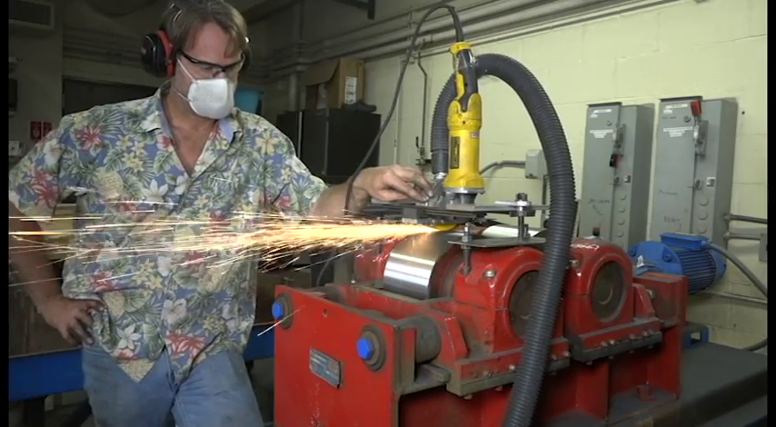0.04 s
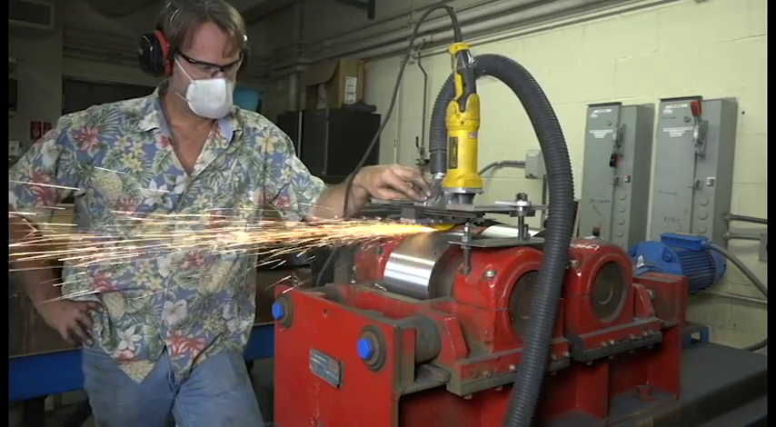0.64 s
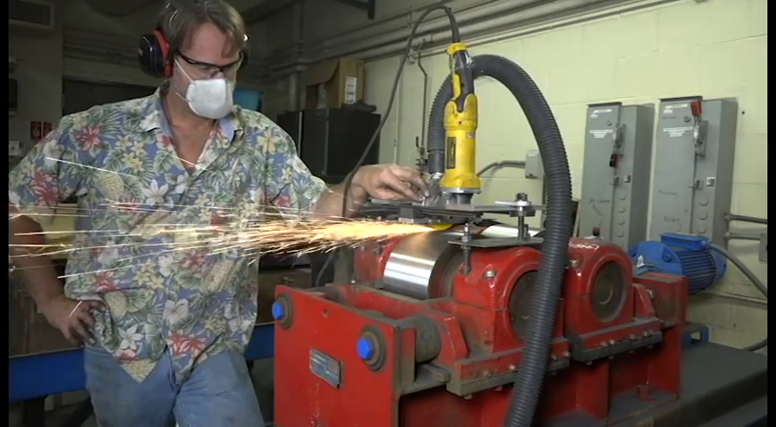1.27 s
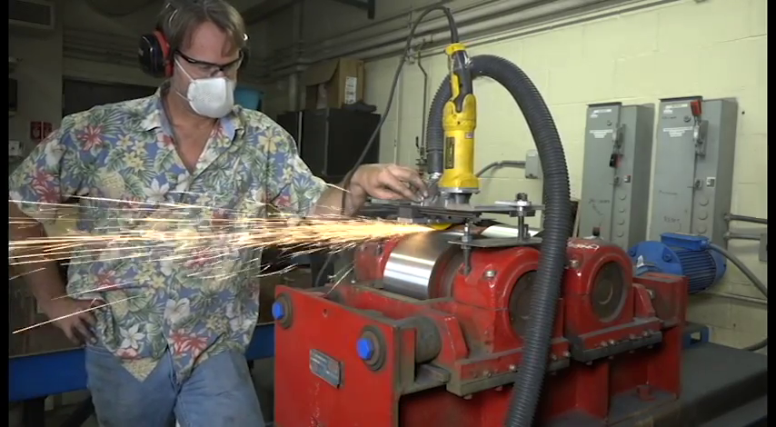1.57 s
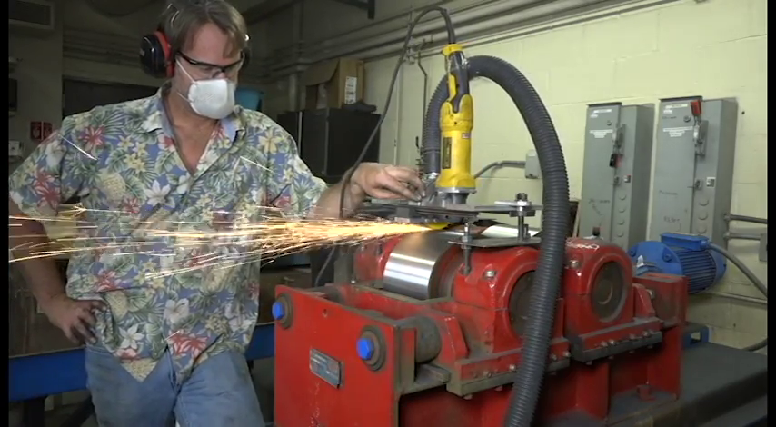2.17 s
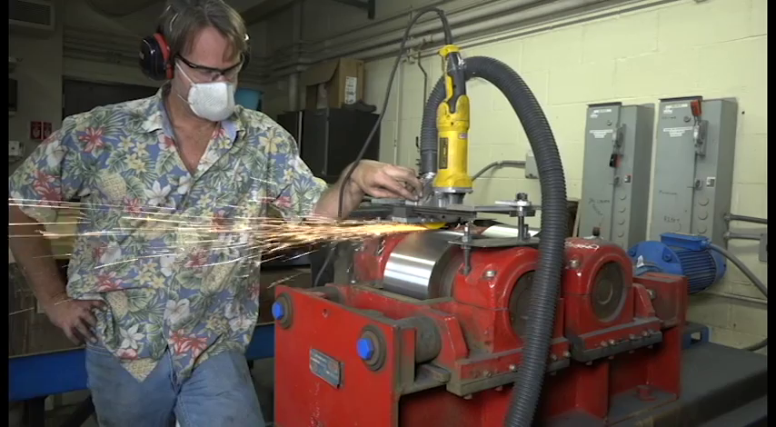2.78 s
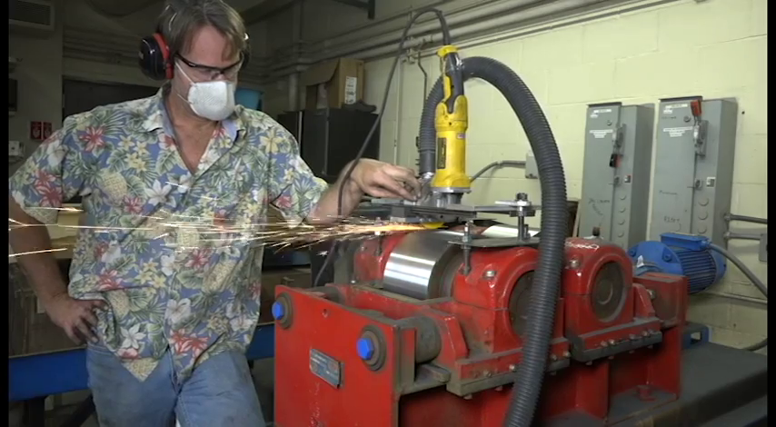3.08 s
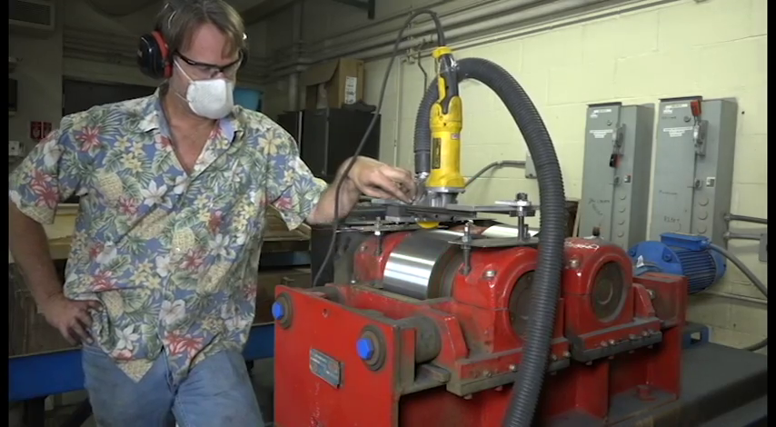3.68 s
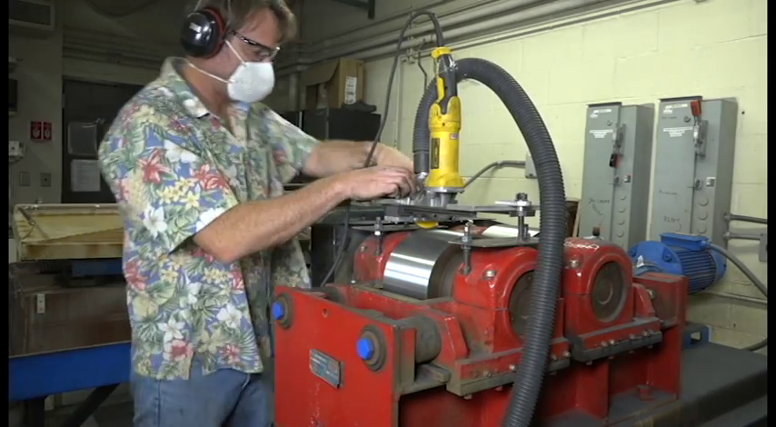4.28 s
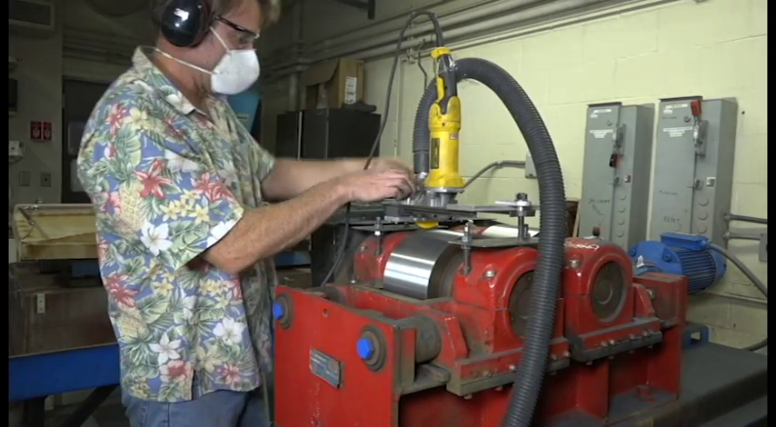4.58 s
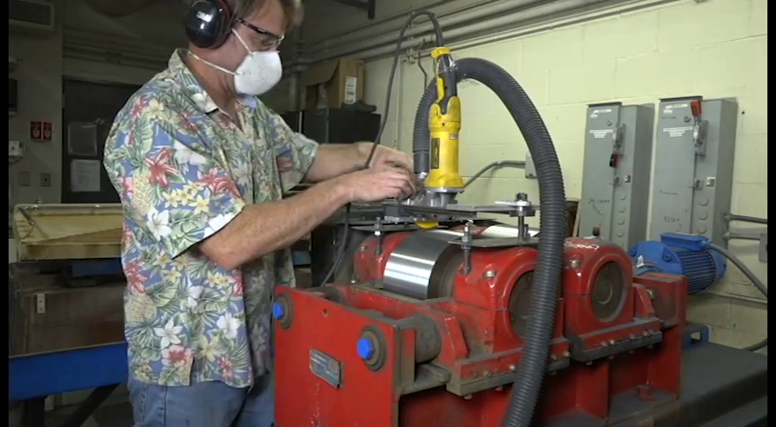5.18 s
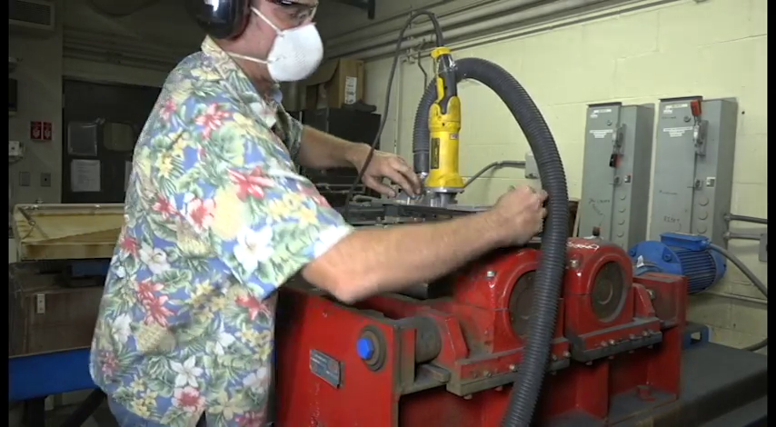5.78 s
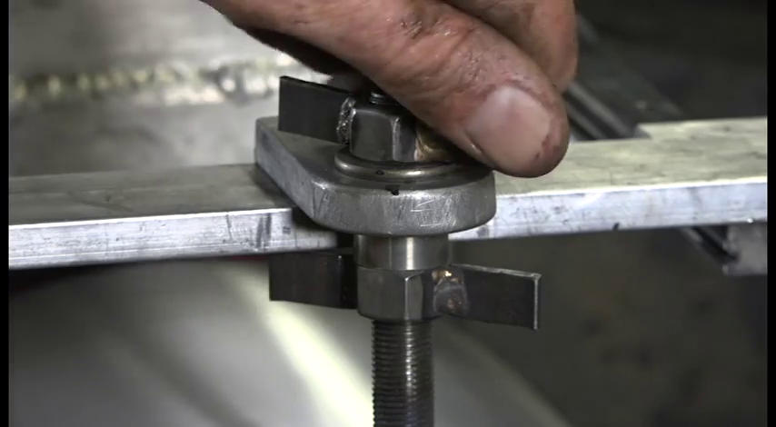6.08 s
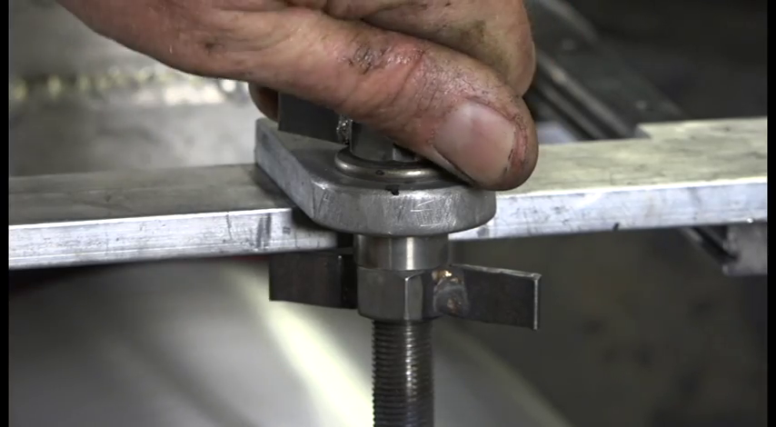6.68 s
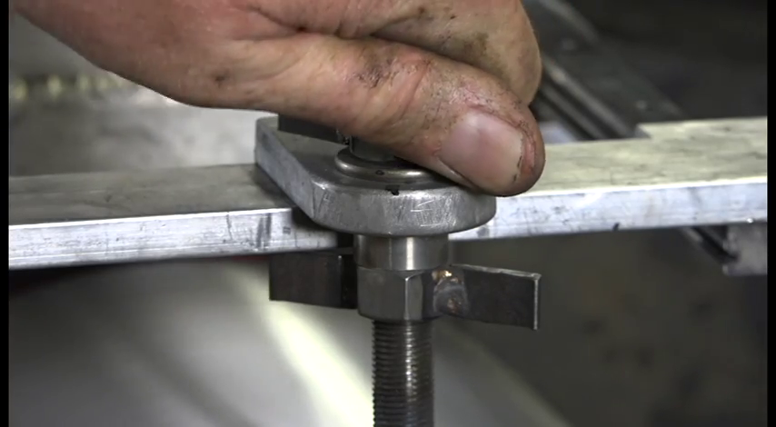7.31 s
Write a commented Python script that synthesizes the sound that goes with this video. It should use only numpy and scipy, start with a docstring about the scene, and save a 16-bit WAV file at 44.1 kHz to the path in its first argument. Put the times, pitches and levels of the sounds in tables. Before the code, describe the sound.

Ringing, hissing grinding on steel fades as the motor whine rises over a dust extractor, then switches to a close machine drone.

```python
"""A rolling mill, heard first from across the workshop: an electric grinder clamped to the mill
dresses a turning steel roll while a dust extractor runs. The disc drags the motor down and rings
under the grit; as the cut fades, the fan's whine climbs to its free pitch over the rush of air.
Then the microphone position jumps close to the feed screw: a fuller, duller rush and a machine drone."""
import sys
import numpy as np
from scipy import signal
from scipy.fft import rfft, irfft
from scipy.io import wavfile

SR = 44100
rng = np.random.default_rng(int(sys.argv[2]) if len(sys.argv) > 2 else 0)


def to_wav(sig):
    """Store sig (one row per channel, or 1-D mono) as 16-bit WAV at the path in sys.argv[1].

    Samples outside -1..1 are clipped; the rate is SR.
    """
    pcm = np.clip(np.atleast_2d(sig), -1, 1) * 32767
    pcm = np.round(pcm).astype(np.int16)
    wavfile.write(sys.argv[1], SR, pcm.T)  # frames by channels


N = 328545
TIME = np.arange(N) / SR
FREQ = np.maximum(np.arange(N // 2 + 1) * SR / N, 1)
JUMP_S = 5.6145  # from the far microphone position to the close one


def undb(db):
    """Decibels to gain."""
    return 10 ** (np.asarray(db) / 20)

def unit(x):
    """Scale to rms 1."""
    return x / np.sqrt(np.mean(x ** 2))

def curve(rows):
    """Join (t/s, value) rows by straight lines."""
    return np.interp(TIME, *np.transpose(rows))

def noise():
    """White noise."""
    return rng.standard_normal(N)

def shape(x, gain):
    """Filter by a gain for each frequency."""
    return irfft(rfft(x) * gain, N)

def walk(rate_hz):
    """Smooth random motion of rms 1, changing about rate_hz times a second."""
    return unit(shape(noise(), 1 / (1 + (FREQ / rate_hz) ** 4)))

def resonance(hz, width):
    """Complex response of one mode, gain 1 at its centre."""
    return 1 / (1 + 1j * (FREQ ** 2 - hz ** 2) / (FREQ * width))

def reflected(x, echo_db=-12, decay_s=.008, count=40):
    """Nearby walls and steel faces add short echoes that ripple the spectrum."""
    spread, polarity = rng.random((count, 2)).T
    lag_s = .002 + 3 * decay_s * spread
    sizes = np.sign(polarity - .5) * np.exp(-lag_s / decay_s)
    echoes = np.bincount((lag_s * SR).astype(int), sizes / np.linalg.norm(sizes), N)
    return shape(x, 1 + undb(echo_db) * rfft(echoes))

def rushing(spectrum, peaks):
    """Noise of rms 1, coloured by a smooth spectrum, resonances and nearby echoes."""
    hz, db = np.transpose(spectrum)
    smooth_db = np.interp(np.log(FREQ), np.log(hz), db)
    lift_db = sum(lift * abs(resonance(f, width)) ** 2 for f, width, lift in peaks)
    return unit(reflected(shape(noise(), undb(smooth_db + lift_db))))

def tone(hz, rms_db, drift, flutter_db):
    """A machine tone wavering a little in strength and pitch."""
    amplitude = np.sqrt(2) * undb(rms_db + flutter_db * walk(2.3))
    cycles = np.cumsum(hz * (1 + drift * walk(4.26))) / SR
    return amplitude * np.sin(2 * np.pi * cycles)


# Far position, extractor tones while unshielded: f/Hz, rms level/dB
EXTRACTOR_TONES = [(203, -91), (404, -78), (479.5, -63.5), (716, -70), (942, -64.5), (1439, -50),
                   (1814.5, -45)]

def extractor(lean_s=4.5, shield_db_per_s=2.5):
    """The extractor hums; the operator leans in and his body shields it more and more."""
    shield_db = shield_db_per_s * np.maximum(TIME - lean_s, 0)
    hum = sum(tone(hz, db, drift=0.00061, flutter_db=1) for hz, db in EXTRACTOR_TONES)
    return undb(-shield_db) * hum


# Close position, machine tones: f/Hz, rms level at the jump/dB, rms level at the end/dB
DRONE_TONES = [(119.5, -66, -64), (360, -52, -50), (454, -45.5, -45), (656, -51, -35.5),
               (798.5, -43.5, -51), (1310.5, -47, -40.5), (1518, -49, -47), (1966, -50, -47),
               (4128, -53, -44), (12452, -55, -56), (13103, -53, -54)]

def machine_drone():
    """The machines drone through the frame; the balance shifts with the microphone's spot."""
    moved = np.interp(TIME, [JUMP_S, TIME[-1]], [0, 1])
    return sum(tone(hz, first_db + (last_db - first_db) * moved, drift=0.000823, flutter_db=1.5)
               for hz, first_db, last_db in DRONE_TONES)


# Close position, spectrum of the rush: f/Hz, relative level/dB
SCREW_SPECTRUM = [(30, -48), (60, -39), (110, -30), (200, -17), (320, -11), (600, -6), (1080, -7),
                  (1400, -6), (2000, -6.5), (4900, -5.5), (7500, -16), (10500, -17.5), (13000, -21.5),
                  (15500, -24.5)]
# Resonances of the mill frame: f/Hz, width/Hz, lift/dB
FRAME_MODES = [(1330, 106, 4.5), (1750, 55, 3.5), (2570, 380, 3), (3350, 520, 1.5), (3850, 160, 2),
               (4970, 260, 1), (5940, 100, 3.5), (6780, 430, 4), (7950, 230, 1.5), (8740, 400, 3)]

def feed_screw_rush(start_db=-25, swell_db_per_s=.5):
    """Close to the feed screw, a full, dull rush swells slowly, coloured by the frame."""
    level_db = start_db + swell_db_per_s * (TIME - JUMP_S) + 0.54 * walk(25)
    return rushing(SCREW_SPECTRUM, FRAME_MODES) * undb(level_db)


# Far position, spectrum of cooling air and suction: f/Hz, relative level/dB
AIR_SPECTRUM = [(30, -64), (90, -59), (160, -54.5), (270, -40), (430, -32), (600, -23.5), (850, -18.5),
                (1300, -14.5), (2400, -9.5), (3400, -8), (4400, -9), (6000, -8), (11700, -8), (15500, -7)]
# Resonances and notches of the vents and hose mouth: f/Hz, width/Hz, lift/dB
VENT_MODES = [(595, 42, -5), (854, 56, 1.5), (1123, 190, 3), (1513, 97, 6), (1616, 120, -3), (1910, 140, 4),
              (2283, 120, 4.5), (4020, 200, 1.5), (4340, 200, -2.5), (4680, 180, 2), (5180, 210, 4.5),
              (5630, 330, 2.5), (7130, 170, 2), (8200, 130, 4.5), (9280, 160, 5), (10030, 310, 4),
              (10670, 490, 4.5), (11800, 400, -1), (12600, 460, 1.5), (14100, 1000, 2)]

def air(load, level_db=-25, sag_db=0.58):
    """Air tears through vents and hose, less as load slows the fan; turbulence flutters the treble."""
    rush = rushing(AIR_SPECTRUM, VENT_MODES)
    treble = shape(rush, FREQ ** 2 / (FREQ ** 2 + 7500 ** 2))
    flutter = undb(0.57 * walk(22)) - 1
    return (rush + treble * flutter) * undb(level_db - sag_db * load)


# Grinder shaft speed, two deep bites and a climb to free running: t/s, f/Hz
SHAFT_SPEED = [(0, 265.1), (0.78, 264.2), (1.35, 274.0), (1.8, 268.9), (2.3, 275.3), (2.75, 277.6),
               (3.8, 289.4), (4.2, 291.4), (5.6, 291.2)]

def shaft(free_hz=291.35, free_wobble=0.00036, load_wobble=0.00099):
    """Turns made and load (0 to 1): the cut drags the shaft below free speed and unsteadies it."""
    hz = curve(SHAFT_SPEED)
    load = np.clip((free_hz - hz) / np.ptp(hz), 0, 1)
    wobble = (free_wobble + load_wobble * load) * walk(24)
    return np.cumsum(hz * (1 + wobble)) / SR, load


# Far position, whine of the cooling fan: t/s, rms level/dB
FAN_WHINE = [(0, -37.5), (0.85, -41.5), (1.6, -50), (2.0, -44), (2.9, -40.5), (3.8, -42), (3.98, -51),
             (4.13, -38.2), (4.33, -42), (4.5, -35.5), (5.15, -35.5), (5.6, -53)]
# Motor overtones: multiple of the shaft rate, rms level free/dB, rms level at full load/dB
OVERTONES = [(11, -48.5, -59), (18, -43, -62), (27, -52, -62)]

def motor(turns, load, blades=9, free_shake_db=1, load_shake_db=1.3):
    """Fan blades and gear teeth whine at multiples of the shaft rate; load shakes the fan's tone."""
    shake_db = (free_shake_db + load_shake_db * load) * walk(19)
    whine = undb(curve(FAN_WHINE) + shake_db) * np.sin(2 * np.pi * blades * turns)
    for order, free_db, loaded_db in OVERTONES:
        level_db = free_db + (loaded_db - free_db) * load + 1.5 * walk(23)
        turbulence = 0.3 * walk(70)  # roughens the tone
        whine += undb(level_db) * np.sin(2 * np.pi * order * turns + turbulence)
    return np.sqrt(2) * whine


# Far position, ringing of disc and steel: f/Hz, width/Hz, relative level/dB
DISC_MODES = [(2430, 270, 2), (2950, 58, 8.5), (3345, 150, 1), (5290, 120, -3), (6030, 150, 6),
              (6920, 170, 5.5), (8470, 160, -3), (9270, 150, -7), (9900, 140, -5), (11220, 92, 2.5)]
# Squeals as the disc catches a high spot: t/s, length/s, level/dB
SQUEALS = [(1.524, 0.033, -35), (1.561, 0.03, -37)]

def grinding(turns, load, grits_per_s=9000, ring_db=-33.5, scratch_db=-50):
    """Grits strike the steel unevenly over each turn, scratching it and ringing the disc."""
    bite_db = np.minimum(2 * rng.exponential(size=N), 8)  # no grit bites deeper than it stands proud
    grits = noise() * (rng.random(N) < grits_per_s / SR) * undb(bite_db)
    contact = load * undb(walk(41)) * (1 + 0.14 * np.sin(2 * np.pi * turns))
    disc = sum(undb(db) * resonance(hz, width) for hz, width, db in DISC_MODES)
    low_cut = (FREQ ** 2 / (FREQ ** 2 + 1500 ** 2)) ** 2
    ring = unit(shape(grits, disc * low_cut))
    scratch = unit(shape(grits, resonance(hz=10700, width=9000) ** 2))
    squeal = unit(shape(noise(), resonance(hz=2960, width=110) ** 2))
    catches = sum(undb(db) * np.exp(-(2 * (TIME - at_s) / length) ** 2) for at_s, length, db in SQUEALS)
    return contact * (undb(ring_db) * ring + undb(scratch_db) * scratch) + catches * squeal


def scene():
    """One microphone on both channels: across the workshop, then at once by the feed screw."""
    turns, load = shaft()
    far = extractor() + air(load) + motor(turns, load) + grinding(turns, load)
    close = machine_drone() + feed_screw_rush()
    sound = np.where(TIME < JUMP_S, far, close)
    return np.array([sound, sound])

def record(dry):
    """The recorder cuts the treble steeply above top_hz."""
    top_hz = 15750
    return signal.sosfilt(signal.ellip(12, .1, 80, top_hz, fs=SR, output="sos"), dry)


dry = scene()
out = record(dry)
to_wav(out)
```